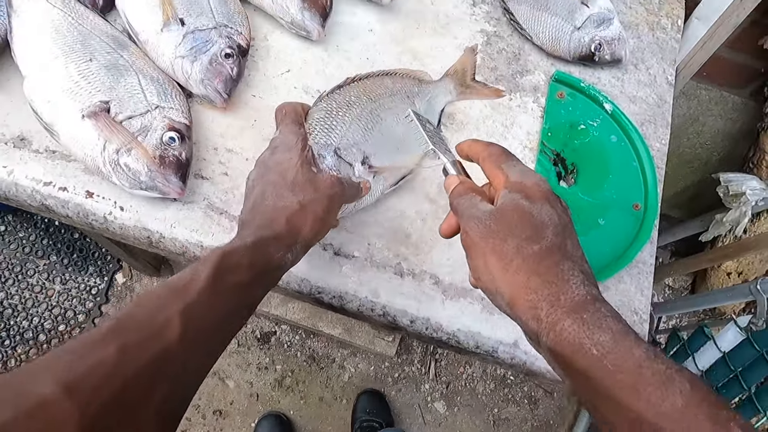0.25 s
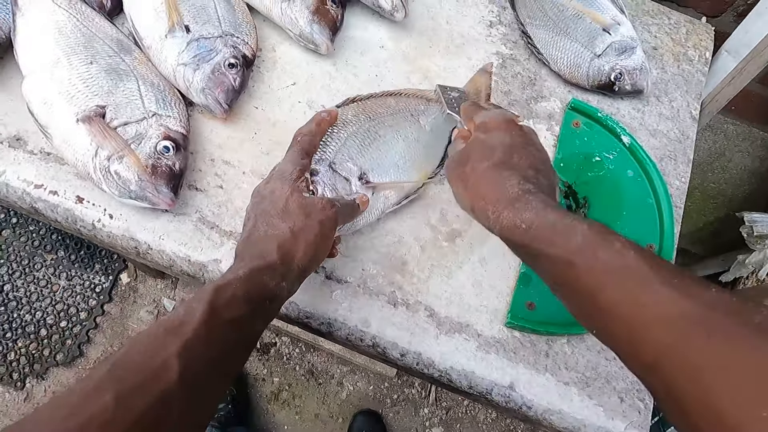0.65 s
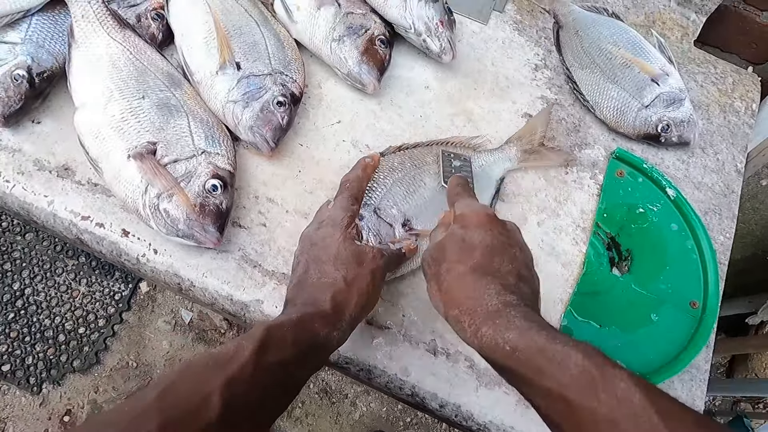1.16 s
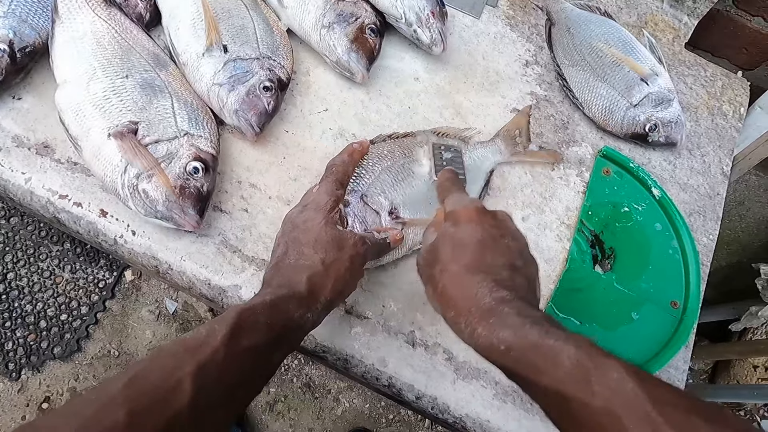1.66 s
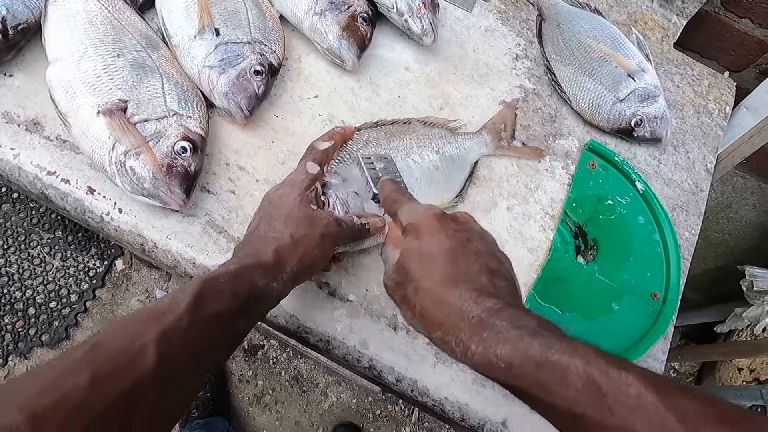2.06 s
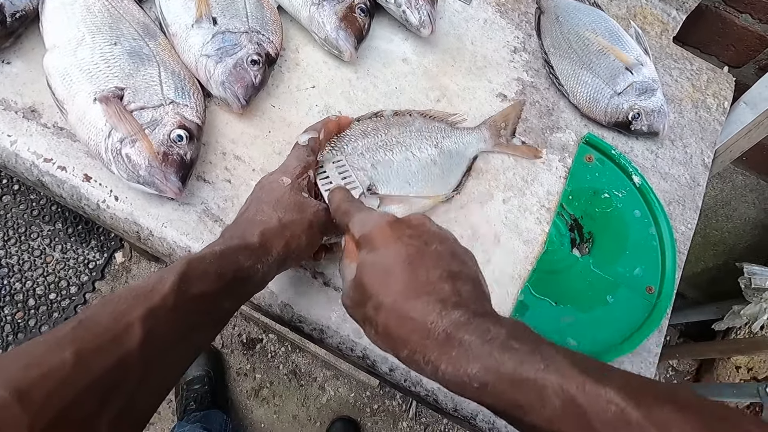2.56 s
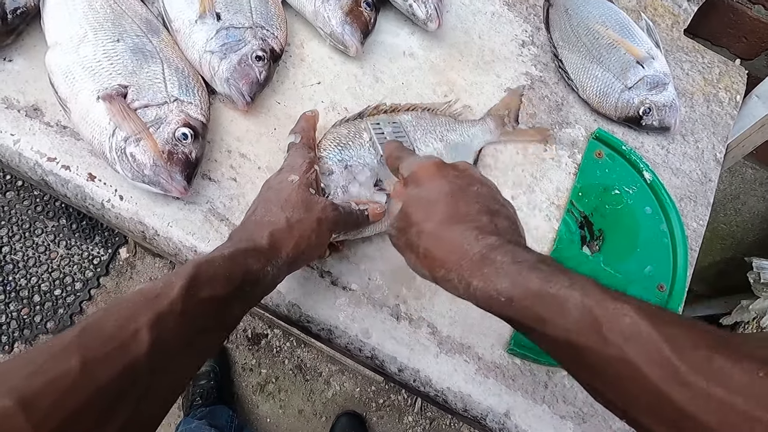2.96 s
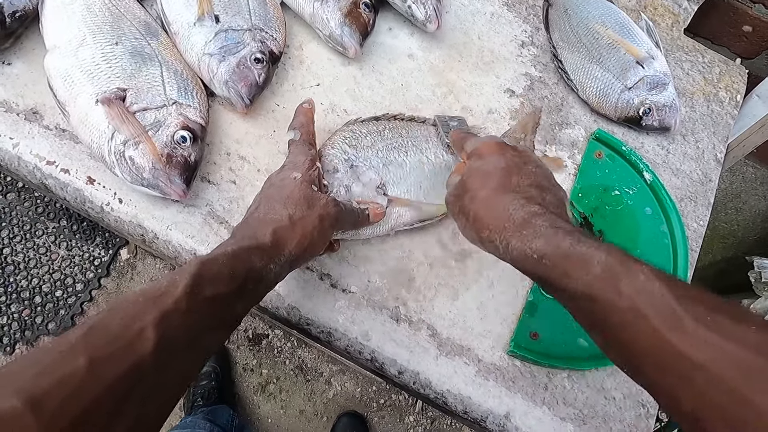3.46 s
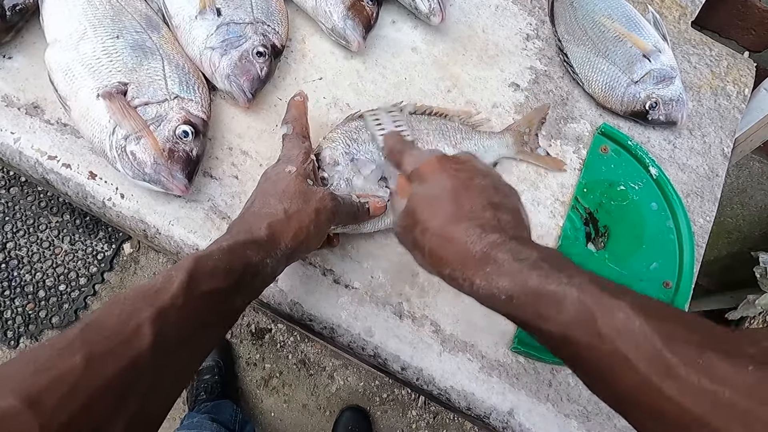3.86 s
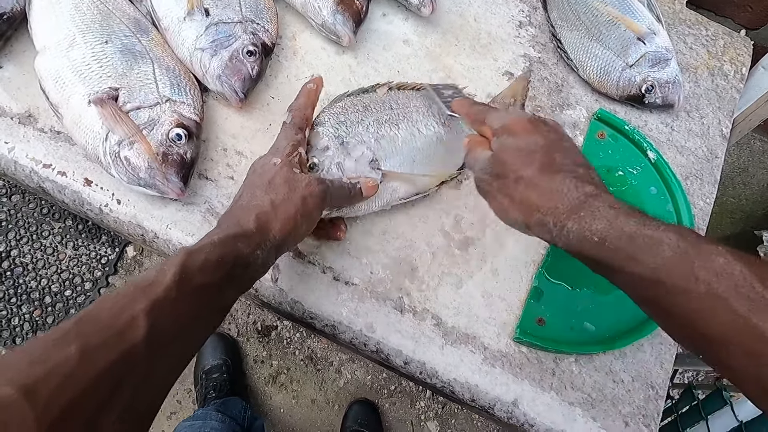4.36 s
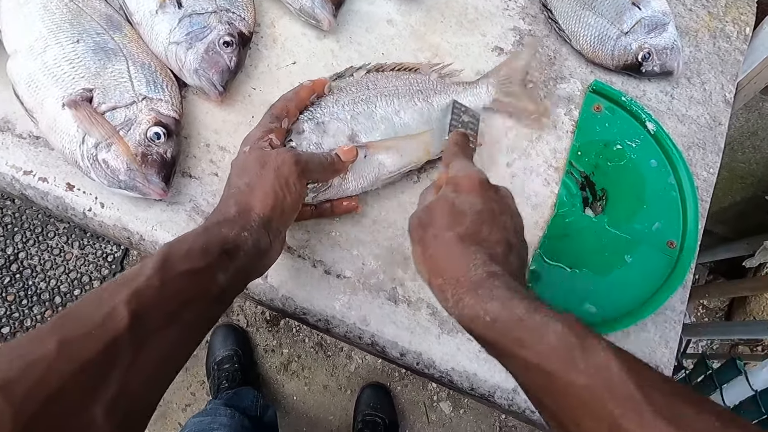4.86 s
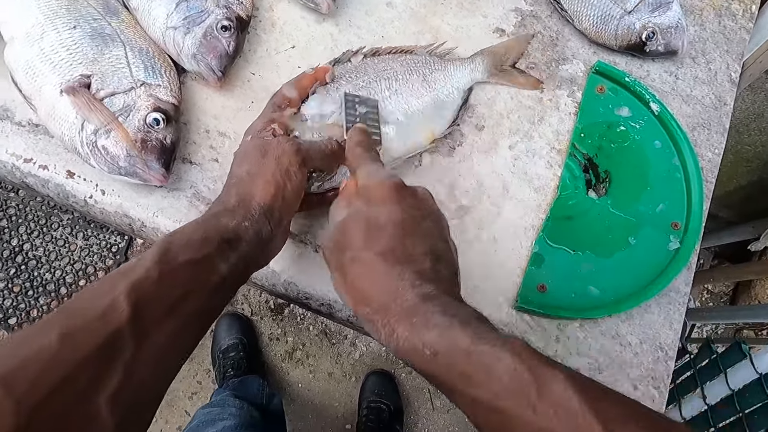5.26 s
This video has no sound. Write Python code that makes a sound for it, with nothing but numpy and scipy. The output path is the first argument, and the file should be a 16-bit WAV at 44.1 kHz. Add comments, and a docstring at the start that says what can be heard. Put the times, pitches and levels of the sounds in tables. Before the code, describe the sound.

Close outdoor sound with low, uneven wind buffeting the microphone and a soft, muffled wash of distant street noise throughout. For the first 0.8 s there are only faint touches and tiny ticks. Then a toothed steel scaler bites into fish scales: short, bright, gritty rasps of about a tenth of a second, roughly three per second, until about 4 s. Each stroke crackles with sharp snapping scales, rings thinly in the steel, and shakes the table with a dull, lumpy thump, especially near 1.45 s. Quieter scratchy drags fill the returns, with brief high squeaks and pings. Hard, hollow table knocks strike at about 1.05 and 2.9 s, with a smaller one at 1.4 s; a strong crack comes near 3.7 s. The strokes pause after 4 s with faint scratching, a light knock at 4.5 s, then three final strokes at 4.6, 4.95 and 5.3 s. Short, dry yard reflections; it ends at 5.5 s.

```python
"""Outdoors, close to the microphone: wind noise gusts over distant street noise from the first moment.
Light touches lead in, then from 0.8 s a toothed steel scaler strokes a fish about three times a second.
Torn scales rasp and snap as noise bursts, steel modes ring and ping, the plastic table drums and is knocked.
The strokes pause after 4 s; a knock at 4.5 s leads into the last three, until the end at 5.5 s."""
import sys
import numpy as np
from scipy import signal
from scipy.fft import rfft, irfft
from scipy.io import wavfile
from scipy.ndimage import uniform_filter1d

SR = 44100
rng = np.random.default_rng(int(sys.argv[2]) if len(sys.argv) > 2 else 0)


def inscribe(sig):
    """Save sig as 16-bit PCM at rate SR to the path in sys.argv[1].

    A 1-D sig is mono; a 2-D sig holds one channel per row.
    Samples are clipped to [-1, 1] before scaling.
    """
    pcm = np.round(np.clip(np.atleast_2d(sig).T, -1, 1) * 32767)
    wavfile.write(sys.argv[1], SR, pcm.astype(np.int16))


N = 242946


def amp(db):
    """Gain from dB."""
    return 10 ** (np.asarray(db) / 20)


def evened(x):
    """Scales to rms 1."""
    return x / np.sqrt(np.mean(x ** 2) + 1e-20)


def curves(rows):
    """Columns of a time table, interpolated at every sample."""
    s, *columns = np.transpose(rows)
    return [np.interp(np.arange(N) / SR, s, c) for c in columns]


def colour(x, points):
    """Causal (minimum-phase) filter with the given spectrum."""
    hz, db = np.transpose(points)
    grid = np.abs(np.fft.fftfreq(16384, 1 / SR)) + 1
    grid_db = np.interp(np.log(grid), np.log(hz), np.maximum(db, -100))
    log_gain = np.log(amp(grid_db))
    taps = np.fft.ifft(np.exp(np.conj(signal.hilbert(log_gain)))).real[:8192]
    return signal.oaconvolve(x, taps)[:N]


def band(x, lo_hz, hi_hz):
    """Steep band-pass, rms 1."""
    return evened(signal.sosfilt(signal.butter(3, [lo_hz, hi_hz], "band", fs=SR, output="sos"), x))


def wander(count, samples):
    """Slow random drift, rms 1: noise averaged twice over a number of samples."""
    noise = rng.standard_normal(count)
    return evened(uniform_filter1d(uniform_filter1d(noise, samples), samples))


def grit(per_s, spread_db, burst_s, bed):
    """Short noise bursts of very uneven size over a bed of sliding noise."""
    struck = rng.random(N) < per_s / SR
    size = amp(spread_db * np.minimum(rng.exponential(1, N), 4)) * struck
    bursts = signal.lfilter([1], [1, -np.exp(-1 / (burst_s * SR))], size)
    return evened(rng.standard_normal(N) * (bed + evened(bursts)))


def ring(x, modes):
    """Sum of two-pole resonances, alternating in sign."""
    out = 0
    for k, (hz, width, db) in enumerate(modes):
        b, a = signal.iirpeak(hz, hz / width, SR)
        out = out + (-1) ** k * amp(db) * signal.lfilter(b, a, x)
    return out


def near(modes, centre_hz, fall_db):
    """Gain of each mode when the place of contact favours those around centre_hz."""
    return [amp(db - fall_db * np.log2(hz / centre_hz) ** 2) for hz, width, db in modes]


def swell(start, length, first_db, last_db, rise, fall):
    """Level in dB: rises (dB/s) to start, glides from first to last, falls (dB/s); and progress 0-1."""
    t = np.arange(N) / SR - start
    along = np.clip(t / length, 0, 1)
    held_db = first_db + (last_db - first_db) * along
    return held_db + rise * np.minimum(t, 0) - fall * np.maximum(t - length, 0), along


def add(mix, s, sound):
    """Mixes a sound in at time s."""
    part = mix[round(s * SR):][:len(sound)]
    part += sound[:len(part)]


# Spectrum of the far street. Each row: frequency in Hz, relative density in dB.
STREET_SPECTRUM = [(150, -40), (300, -2), (450, -5.5), (850, -7.5), (1300, -17), (2000, -21.5),
                   (3500, -28.5), (7300, -36), (8300, -45), (11000, -51), (16000, -89)]
# Swell of the far street. Each row: time in seconds, level in dB before the random drift.
STREET_SWELL = [(0, -42), (.7, -42), (1.5, -42.5), (2.5, -45.5), (3.5, -44), (4.4, -45), (5.51, -44.5)]


def street():
    """Distant street noise: coloured noise that swells slowly and drifts at random."""
    (level_db,) = curves(STREET_SWELL)
    drift_db = 2.4 * wander(N, 6000)
    return amp(level_db + drift_db) * evened(colour(rng.standard_normal(N), STREET_SPECTRUM))


# Spectrum of wind at the microphone. Each row: frequency in Hz, relative density in dB.
WIND_SPECTRUM = [(5.9, -34), (10, -5), (59, -0.5), (145, -4.5), (239, -14), (317, -10), (371, -10.5),
                 (420, -17.5), (550, 0), (920, -120)]
# Gusts on the microphone. Each row: time in seconds, level of the low wind in dB.
GUSTS = [(0.0, -17), (0.04, -32), (0.06, -22), (0.44, -37.5), (0.49, -24.5), (1.32, -33), (1.35, -25.5),
         (1.55, -34.5), (1.67, -26), (1.72, -39), (1.76, -28.5), (1.84, -36.5), (2.25, -33), (2.29, -27.5),
         (2.33, -36.5), (2.67, -31), (2.75, -25.5), (2.87, -45), (2.9, -34), (3.27, -29), (3.31, -38),
         (3.36, -23), (3.42, -30), (3.47, -22.5), (3.57, -28), (3.61, -26), (3.94, -26), (4.29, -35.5),
         (4.4, -22.5), (4.48, -40), (4.54, -23), (4.6, -33.5), (4.63, -24.5), (5.22, -37), (5.32, -28),
         (5.51, -33.5)]
# Flutter over the gusts. Each row: time in seconds, level of the upper wind in dB.
FLUTTER = [(0.0, -29), (0.04, -42), (0.07, -23.5), (0.37, -49.5), (0.49, -35.5), (0.84, -31.5), (1.0, -43),
           (1.13, -31), (1.39, -43), (1.46, -32.5), (1.5, -38), (2.52, -43.5), (2.75, -28), (2.85, -39.5),
           (3.21, -32), (3.31, -44), (3.36, -29), (3.9, -34.5), (4.2, -43), (4.59, -37.5), (4.63, -22),
           (4.69, -39.5), (5.05, -32), (5.09, -44), (5.39, -33.5), (5.51, -42.5)]


def wind():
    """Turbulence buffets the microphone: low gusting noise, with a lumpy flutter in a band above it."""
    (low_db,), (upper_db,) = curves(GUSTS), curves(FLUTTER)
    lumps = amp(3.7 * wander(N, 900))
    air = colour(rng.standard_normal(N), WIND_SPECTRUM)
    low = amp(low_db) * band(air, 18, 107.2)
    upper = amp(upper_db) * evened(band(air, 137.0, 282.0) * lumps)
    return low + upper


def yard(x):
    """Short sparse reflections from table, wall and ground, of random sign and dying away."""
    t = np.arange(4000) / SR
    signs = rng.choice([-1., 1.], len(t))
    sparse = rng.random(len(t)) < .05
    taps = signs * sparse * amp(-60 * t / 0.037) * (t > .002)
    return signal.oaconvolve(x, taps / np.linalg.norm(taps))[:N]


# Modes of the cutting table. Each row: frequency in Hz, width in Hz of the sharper of two resonances
# in series, relative gain in dB before the place of pressure weights it.
TABLE_MODES = [(334, 27.3, 2), (395, 95, -1), (477.6, 99, -2.5), (562.5, 25, -5.5), (721, 35, 3),
               (763, 52, -1), (1000, 54, -10)]
BUILD_DB, PUSH_FALL_DB_PER_S = 22, 620  # rise over the build-up time; fall after the push
PUSH_SAG, LUMP_DB = 0.93, 1.5  # factor on the favoured pitch over a push; unevenness of its level
# Pushes of the hand. Each row: end of the build-up in seconds, build-up in seconds, length after it in
# seconds, level at the end of the build-up in dB, level at the end of the push in dB,
# favoured frequency at the end of the build-up in Hz.
PUSHES = [(0.844, 0.029, 0.038, -29, -39, 635), (1.12, .03, 0.028, -29, -41, 484),
          (1.186, .05, 0.026, -27.5, -32.5, 420), (1.464, .06, 0.065, -15, -43, 493),
          (1.75, 0.027, 0.068, -28, -28.5, 438), (2.056, 0.034, 0.013, -30.5, -44, 480),
          (2.109, 0.048, 0.0065, -28.5, -34, 426), (2.31, 0.028, 0.073, -36.5, -30.5, 443),
          (2.599, .035, 0.046, -30.5, -34, 430), (2.717, 0.019, 0.081, -36, -55, 434),
          (2.958, 0.047, 0.046, -31, -38, 410), (3.256, 0.027, 0.043, -35.5, -35.5, 470),
          (3.342, .025, 0.033, -30.5, -48, 474), (3.448, 0.023, 0.11, -35, -53, 387),
          (3.625, .035, 0.098, -30, -41.5, 490), (3.89, .03, 0.024, -36, -50, 594),
          (3.97, 0.058, 0.037, -33, -33, 570), (4.604, 0.04, 0.048, -24.5, -19.5, 587),
          (4.669, .02, 0.043, -25.5, -39, 510), (4.947, 0.05, 0.013, -18, -22.5, 586),
          (4.99, .03, 0.048, -19.5, -39, 480), (5.275, 0.028, 0.11, -15, -37.5, 510)]


def drumming(s, build, length, level_db, end_db, centre_hz):
    """Dull, lumpy slips shake the table; the place of pressure picks the modes."""
    db, along = swell(s, length, level_db, end_db, BUILD_DB / build, PUSH_FALL_DB_PER_S)
    heard = np.flatnonzero(db > -75)
    gains = near(TABLE_MODES, centre_hz * PUSH_SAG ** along[heard], 17.0)
    noise = rng.standard_normal(len(heard))
    slips = signal.lfilter([1], [1, -.9], noise) / np.sqrt(sum(g ** 2 for g in gains))
    shake = 0
    for g, (hz, width, _) in zip(gains, TABLE_MODES):
        sharp = ring(g * slips, [(hz, width, 0)])
        shake = shake + ring(sharp, [(hz, 3 * width, 0)])
    lumps_db = LUMP_DB * wander(len(heard), 200)
    body = band(shake, 245, 1600) + 0.063 * band(noise, 720, 2180)
    return heard[0] / SR, amp(db[heard] + lumps_db) * body


# Modes of the table's stiffer rim. Each row: frequency in Hz, width in Hz before each blow's damping,
# relative gain in dB before the place of the blow weights it.
RIM_MODES = [(385, 31, -5.5), (488, 84, -2), (698, 43, -0.5), (839, 56, 1), (1140, 73, -12.5),
             (1480, 100, -14.5), (1640, 120, -43), (2040, 50, -12), (2420, 80, -27)]
# Knocks on the rim. Each row: time in seconds, peak of the ringing modes in dB,
# favoured frequency in Hz, damping as a factor on the mode widths.
KNOCKS = [(1.06, -8, 854, 0.57), (1.395, -21, 630, 1.1), (2.87, -9, 790, .7), (2.917, -15.5, 650, 0.55),
          (2.925, -27, 700, .8), (4.53, -22, 730, 0.8)]


def knocks():
    """Each blow rings the rim's modes around the place it strikes, and bounces once."""
    out, t = np.zeros(N), np.arange(5000) / SR
    for s, db, centre_hz, damp in KNOCKS:
        modes = 0
        for k, (gain, (hz, width, _)) in enumerate(zip(near(RIM_MODES, centre_hz, 2.8), RIM_MODES)):
            decay = np.exp(-np.pi * width * damp * t)
            modes = modes + (-1) ** k * gain * decay * np.sin(2 * np.pi * hz * t)
        modes *= (1 - np.exp(-t / 0.00032)) / np.abs(modes).max()  # a padded blow builds up over a cycle
        # loose things on the table
        rattle = 0.055 * band(rng.standard_normal(len(t)), 540, 4100) * np.exp(-t / 0.0054)
        # the scaler slides off
        scuff = .04 * band(rng.standard_normal(len(t)), 450, 1500) * np.exp(-t / 0.029)
        add(out, s, amp(db) * (modes + rattle + scuff))
        add(out, s + 0.00657, amp(db - 1.5) * modes)  # the bounce
    return out


PING_T60_S = 0.05
# Squeaks and pings of the steel. Each row: start in seconds, level in dB before onset and decay,
# pitch in Hz, time held in seconds.
PINGS = [(.783, -33, 5620, .008), (.9, -40.5, 5440, 0.026), (.9, -39, 4500, .0095), (.98, -49, 3500, .022),
         (1.02, -47, 4600, 0.033), (1.025, -38.5, 6760, 0.0093), (1.028, -41.5, 3390, 0.036),
         (1.046, -45, 6870, 0.0078), (1.069, -50, 5600, 0.013), (1.96, -39, 3380, 0.0037),
         (2.706, -34, 3520, 0.0072), (2.752, -40, 3450, 0.0047), (2.855, -45, 6950, .0093),
         (2.86, -45, 4600, .006), (3.13, -50, 3400, .033), (3.185, -41, 4440, .008),
         (3.881, -51, 3420, 0.022), (3.952, -49, 3340, 0.013), (4.215, -44.5, 3210, 0.02),
         (4.51, -43, 1103, .012), (4.862, -39, 1080, 0.0098)]


def pings():
    """One steel mode, as narrow noise, rubbed unevenly for a moment and left to die."""
    out, t = np.zeros(N), np.arange(6000) / SR
    for s, db, hz, held in PINGS:
        rub = rng.standard_normal((2, len(t) + 1000))
        unevenness = amp(1.6 * evened(uniform_filter1d(rub[1], 90)))
        tone = band(rub[0], hz * .96, hz * 1.04) * unevenness
        shape = amp(-60 * np.maximum(t - held, 0) / PING_T60_S) * np.minimum(t / 0.0015, 1)
        add(out, s, amp(db) * evened(tone[1000:]) * shape)  # the filter's start-up is skipped
    return out


CRACK_T60_S = 0.027
# Scales that snap loudly. Each row: time in seconds, starting level of the crack's main band in dB,
# its centre in Hz, starting level of the tick in dB.
SNAPS = [(0.0562, -39, 4300, -45), (.7203, -46, 1640, -57), (0.841, -26, 3480, -46),
         (0.855, -25, 4470, -35), (.8774, -30, 6800, -39), (1.126, -27.5, 3670, -24.5),
         (1.1692, -20.5, 6250, -30), (1.201, -19, 3800, -18), (1.233, -36, 7000, -27),
         (1.4274, -40, 3710, -53), (1.4422, -29, 3300, -26.5), (1.504, -33, 3730, -38),
         (1.6327, -39, 7800, -36), (1.788, -26, 7320, -33), (1.801, -21, 2870, -28),
         (1.8125, -22, 3470, -26), (1.8337, -21, 5570, -22), (2.0834, -30, 6860, -29),
         (2.209, -52, 3200, -40), (2.3823, -19.5, 5330, -24), (2.4422, -25.5, 6550, -26),
         (2.578, -37.5, 1650, -54), (2.6386, -27, 6100, -37), (2.678, -37, 4070, -46),
         (2.955, -32, 7060, -36), (2.998, -26.5, 3170, -29), (3.031, -34, 6800, -24),
         (3.248, -28, 6340, -28), (3.3186, -34, 7130, -30), (3.349, -19.5, 6200, -29),
         (3.3822, -28.5, 6200, -31), (3.62, -31, 6830, -32), (3.681, -15, 1600, -19),
         (3.9515, -31, 6560, -43), (4.005, -23.5, 6500, -27), (4.0144, -20, 5800, -40),
         (4.093, -37, 5870, -34), (4.2332, -35.5, 1460, -49), (4.3938, -45, 3700, -55),
         (4.5116, -35, 2450, -56), (4.609, -32, 3520, -20), (4.713, -21, 6800, -21),
         (4.727, -36.5, 2920, -24), (4.861, -46, 3600, -52), (4.9054, -41, 2000, -49),
         (4.941, -33, 2050, -28), (5.0882, -34.5, 1800, -47), (5.334, -23.5, 5450, -29),
         (5.39, -29, 6160, -48), (5.4295, -37, 5800, -44)]


def snaps():
    """A thin sharp tick together with a crack of noise centred on each scale's own pitch."""
    out, t = np.zeros(N), np.arange(3000) / SR
    for s, db, hz, tick_db in SNAPS:
        noise = rng.standard_normal(len(t) + 300)  # the first 300 let the filters settle
        tick = amp(tick_db) * band(noise, 5700, 12600)[300:] * np.exp(-t / 0.0007)
        splinter = band(noise, hz * 0.74, hz * 1.19) + 0.37 * band(noise, 1100, 8600)
        crack = splinter[300:] * amp(db - 60 * t / CRACK_T60_S)
        add(out, s, (tick + crack) * np.minimum(t / .0003, 1))
    return out


# Spectrum of scales under the teeth. Each row: frequency in Hz, relative density in dB.
RASP_SPECTRUM = [(530, -50), (900, -7), (1100, -1.5), (1370, -13), (1540, -3.5), (1980, -3.5), (2230, -8),
                 (3430, -0.5), (4620, -5), (6850, 1.5), (9230, -16), (12400, -14.5), (15600, -28)]


def tearing():
    """Wide slips shared by all teeth, plus scales of five sizes that each crackle in their own band."""
    edges_hz = [900, 1900, 3100, 4800, 7600, 15000]
    sizes = 0
    for lo, hi in zip(edges_hz, edges_hz[1:]):
        crackle = grit(per_s=160, spread_db=0.5, burst_s=0.0039, bed=1.0)
        sizes = sizes + np.sqrt(hi - lo) * band(crackle, lo, hi)
    shared = grit(per_s=500, spread_db=4.8, burst_s=.0007, bed=.35)
    return colour(shared + .8 * evened(sizes), RASP_SPECTRUM)


DIG_DB, RISE_DB_PER_S, FALL_DB_PER_S = 23, 558, 659  # strokes rise DIG_DB over their dig-in, drags at RISE
ARCH_DB = 0.5  # slight extra level midway through each stroke
RING_SAG_DB, DULL_SAG_DB = 4, 6.5  # buried in scales the steel is damped and the rasp thins, bite to lift
DRAG_DULL_DB, DRAG_FIZZ_DB, HOVER_DB = -3.5, -19, -78  # shares relative to the rasp; rasp between contacts
# Strokes against the scales. Each row: bite in seconds, dig-in in seconds, length in seconds, rasp at
# bite in dB, rasp at lift in dB, steel centre at bite in Hz, steel centre at lift in Hz,
# steel ring midway, dull share at bite and fizz, these three in dB relative to the rasp.
STROKES = [(0.845, 0.02, 0.059, -26, -34, 5100, 5600, 14, -4.5, -20),
           (1.122, .035, 0.1, -37.5, -29, 4770, 4600, 9, -1.5, -15),
           (1.44, 0.027, .1, -36, -28.5, 4000, 4830, 11.5, -1, -12),
           (1.762, 0.036, 0.068, -35.5, -26.5, 4020, 4860, 17.5, -2, -11.5),
           (2.049, 0.037, 0.057, -38, -24, 4440, 6200, 17.5, -2.5, -11),
           (2.325, 0.033, 0.056, -38.5, -28, 5700, 5200, 3, 1.5, -12),
           (2.59, .035, 0.061, -44, -30, 4300, 5600, 11, 0.5, -14.5),
           (2.95, 0.046, 0.095, -30.5, -39, 5800, 5270, 16.5, 0.5, -14),
           (3.267, 0.041, 0.12, -33, -38, 5800, 6500, 16, -2, -12),
           (3.623, 0.044, 0.091, -30.5, -36, 4900, 6400, 13.5, 2, -13),
           (3.954, 0.018, 0.071, -34, -34.5, 5130, 6300, 17.5, 6.5, -25),
           (4.603, 0.032, 0.12, -33, -35, 4100, 6640, 11.5, -1, -15),
           (4.935, 0.059, 0.096, -34, -31.5, 5050, 6200, 18, -1.5, -13),
           (5.267, .04, 0.1, -37, -29.5, 5800, 6000, 12.5, -0.5, -16.5)]
# Light drags and touches as the scaler returns. Each row: start in seconds, length in seconds,
# rasp at start in dB, rasp at end in dB, steel centre in Hz, steel ring in dB relative to the rasp.
DRAGS = [(.29, 0.043, -62, -57, 4500, 2), (.585, 0.022, -65, -58, 4500, 4),
         (0.792, 0.045, -39, -40, 5500, 21), (0.962, 0.095, -50.5, -43.5, 5600, 14.5),
         (1.095, .015, -50, -49, 4500, 12), (1.291, 0.042, -45, -51, 5300, 19.5),
         (1.36, 0.057, -57, -49, 4500, 13), (1.603, 0.093, -52, -54, 4400, 12),
         (1.866, .1, -49.5, -49.5, 3900, 10), (2.17, 0.066, -52, -53, 4000, 10),
         (2.44, 0.046, -44.5, -45.5, 6700, 26), (2.707, 0.13, -47, -53, 3500, 20.5),
         (2.823, 0.041, -55, -42, 5300, 13), (3.12, 0.073, -55, -44.5, 4300, 20.5),
         (3.446, 0.11, -56, -48, 4300, 13), (3.76, .08, -62.5, -52, 3900, 8),
         (3.878, 0.054, -50.5, -50, 4200, 8), (4.073, 0.097, -47.5, -49.5, 4930, 14),
         (4.221, 0.0094, -47, -41, 3600, 8), (4.275, .16, -60.5, -60.5, 3900, 18),
         (4.526, 0.036, -42, -53.5, 4100, 20.5), (4.566, .02, -50.5, -45.5, 3700, 21),
         (4.76, .06, -55, -58, 6000, 17), (4.835, 0.03, -58, -51, 4200, 13),
         (5.098, 0.038, -45, -60, 4300, 5), (5.24, 0.017, -46, -47, 6500, 23),
         (5.397, 0.081, -49.5, -54.5, 6200, 20.5), (5.48, .04, -57, -62.5, 6100, 16)]


def contact():
    """Rasp level and the colour of whichever stroke or drag is loudest at each moment."""
    # rows: rasp dB, steel ring dB, steel centre Hz, dull share dB, fizz dB
    state = np.tile([[HOVER_DB], [10.], [4500.], [DRAG_DULL_DB], [DRAG_FIZZ_DB]], N)

    def take(*new):
        """The new contact wherever its rasp is louder."""
        louder = new[0] > state[0]
        return np.array([np.where(louder, a, b) for a, b in zip(new, state)])

    for s, dig, length, first_db, last_db, first_hz, last_hz, ring_db, dull_db, fizz_db in STROKES:
        db, along = swell(s, length, first_db, last_db, DIG_DB / dig, FALL_DB_PER_S)
        state = take(db + ARCH_DB * np.sin(np.pi * along), ring_db - RING_SAG_DB * (along - .5),
                     first_hz + (last_hz - first_hz) * along, dull_db - DULL_SAG_DB * along, fizz_db)
    for s, length, first_db, last_db, hz, ring_db in DRAGS:
        db, _ = swell(s, length, first_db, last_db, RISE_DB_PER_S, FALL_DB_PER_S)
        state = take(db, ring_db, hz, DRAG_DULL_DB, DRAG_FIZZ_DB)
    return uniform_filter1d(state, size=200, axis=1)


# Modes of the steel scaler. Each row: frequency in Hz, width in Hz, relative gain in dB before the
# place of contact weights it.
STEEL_MODES = [(3200, 130, -11), (3506, 330, 6.5), (4476, 86, -0.5), (5160, 57, -11), (6490, 130, -7.5),
               (7010, 133, 5.5), (6500, 61, -6)]


def scraping():
    """Teeth tear the scales in three bands of rasp; the same motion rings the steel with gritty taps."""
    rasp_db, steel_db, steel_hz, dull_db, fizz_db = contact()
    slips = tearing()
    fizz = amp(rasp_db + fizz_db) * band(slips, 8850, 16300)  # the driest, thinnest scales
    bright = amp(rasp_db) * band(slips, 2720, 8930)
    dull = amp(rasp_db + dull_db) * band(slips, 460, 2870)
    gains = near(STEEL_MODES, steel_hz, 24.0)
    taps = amp(rasp_db + steel_db) * grit(per_s=280, spread_db=15.0, burst_s=0.01, bed=0.15)
    taps /= np.sqrt(sum(g ** 2 for g in gains))
    steel = sum(ring(g * taps, [(hz, width, 0)]) for g, (hz, width, _) in zip(gains, STEEL_MODES))
    return fizz + bright + dull + steel


def scene():
    """All sources reach the microphone from one direction; the work at the table also echoes in the yard."""
    work = scraping() + snaps() + pings() + knocks()
    for push in PUSHES:
        add(work, *drumming(*push))
    return np.tile(work + amp(-10.0) * yard(work) + wind() + street(), (2, 1))


# Unlikeness of the two microphone ports. Each row: frequency in Hz, side relative to mid in dB
# before the flutter scales it.
PORTS = [(60, -106), (9500, -31.5), (11300, -8), (15000, -0.5)]


def record(dry):
    """The ports differ mainly in the top treble, unsteadily, the left duller on average; then a low-pass."""
    mid = dry.mean(0)
    flutter = wander(N, 150)
    hz, db = np.transpose(PORTS)
    side_db = np.interp(np.log(np.fft.rfftfreq(N, 1 / SR) + 1), np.log(hz), db)
    top = irfft(rfft(mid) * amp(side_db), N)
    side = (1.1 * flutter - .6) * top
    pair = np.array([mid + side, mid - side])
    low_pass = signal.firwin(511, 15750, window=("kaiser", 9), fs=SR)
    return signal.oaconvolve(pair, low_pass[None], "same")


dry = scene()
out = record(dry)
inscribe(out)
```